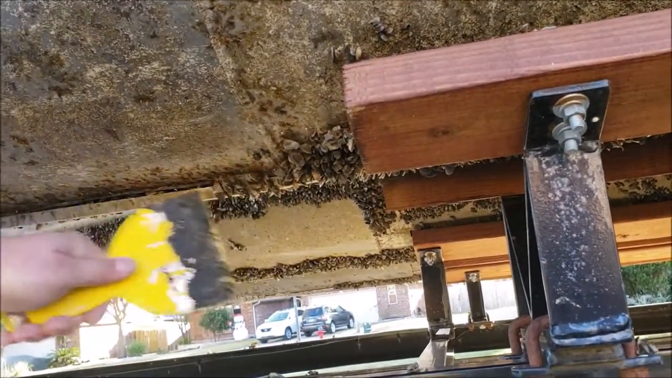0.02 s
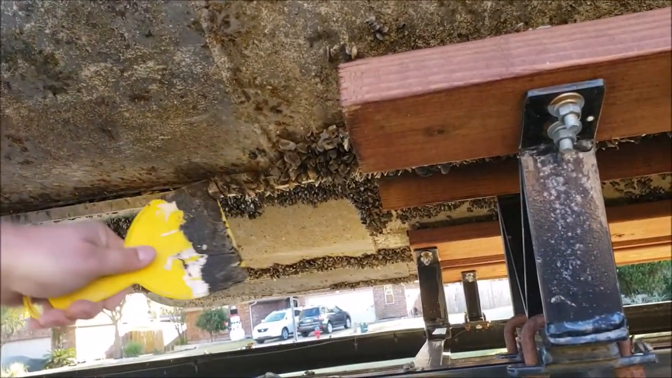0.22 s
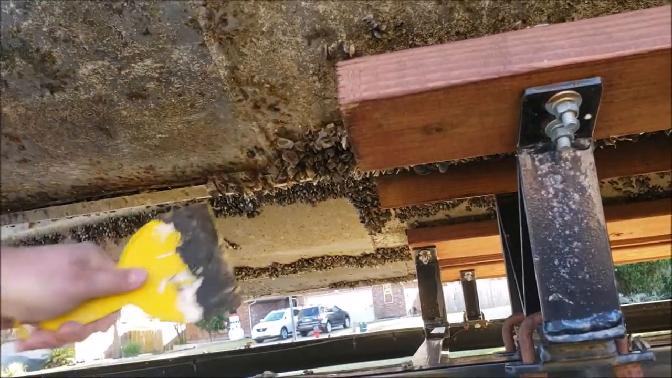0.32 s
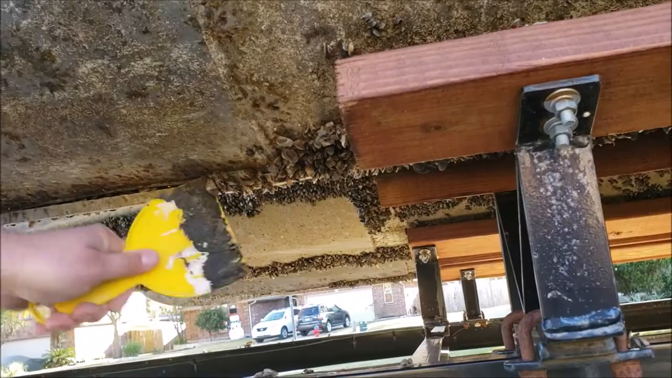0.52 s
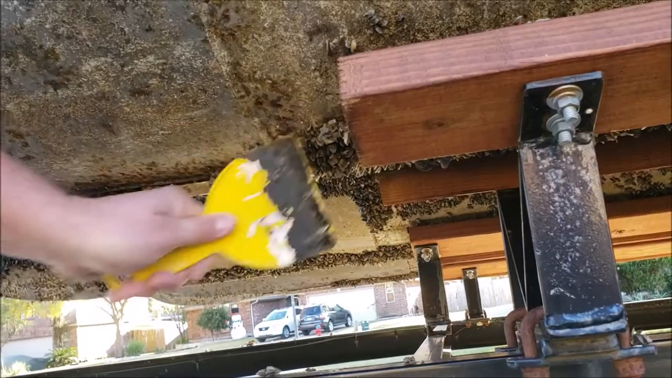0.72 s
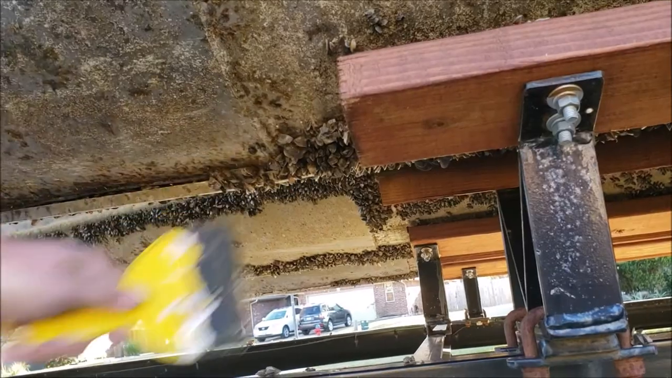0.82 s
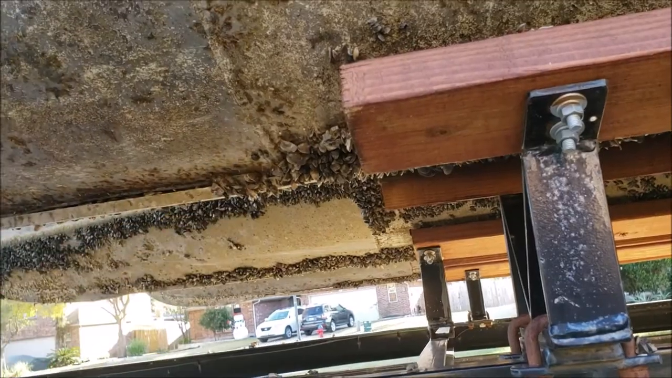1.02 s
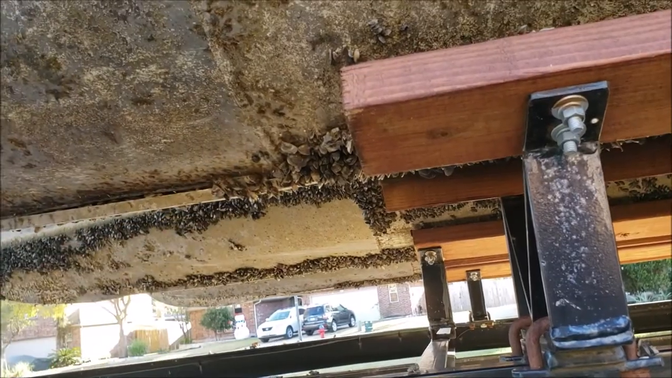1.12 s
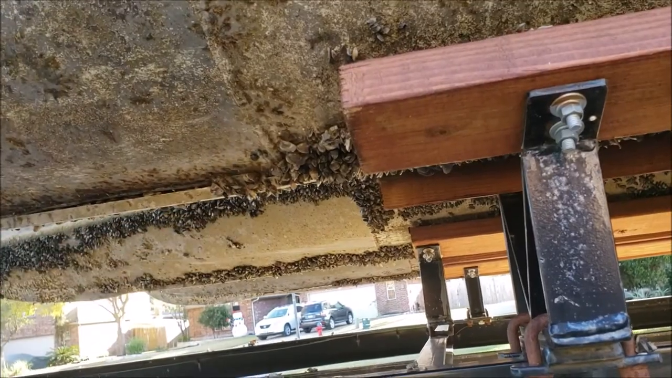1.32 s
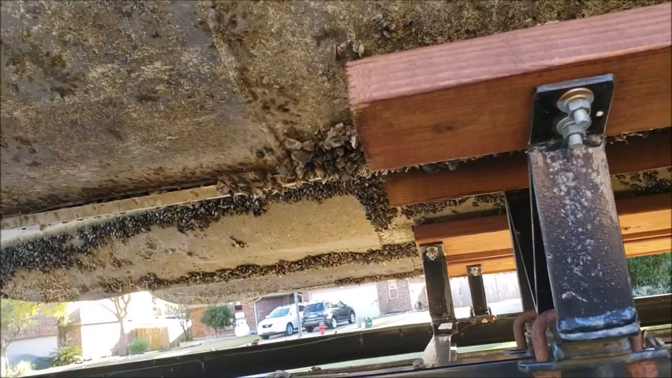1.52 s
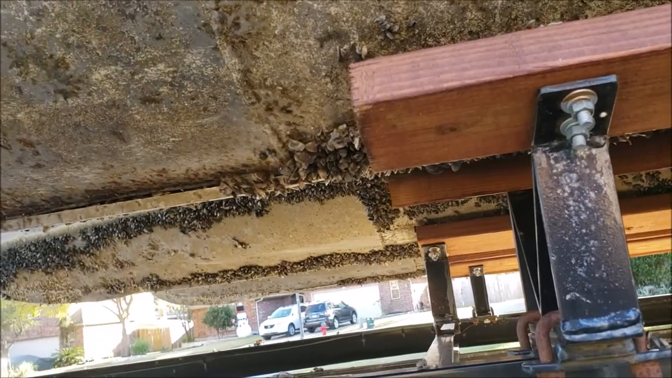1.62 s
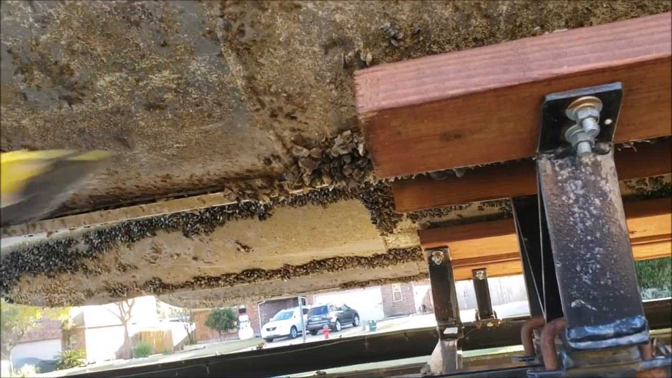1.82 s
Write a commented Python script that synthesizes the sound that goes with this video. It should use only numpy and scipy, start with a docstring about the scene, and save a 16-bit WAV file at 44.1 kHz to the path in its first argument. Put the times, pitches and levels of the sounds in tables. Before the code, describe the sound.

A hand scraper judders twice across crusted shells under a hollow metal boat tube, making it ring and boom. A shell cracks off and its pieces land. Outdoors, with a short echo and a distant rumble.

```python
"""Over a distant rumble and a fading ring, crumbs tick and a hand scraper judders across a shell crust.
The crust coats the underside of a hollow metal boat tube, outdoors. Twice the blade judders, knocking
the wall so that the tube rings and booms; then a shell cracks off and its pieces land.
Something swishes faintly near the end. The deck overhead throws the sound of the work back."""
import sys
import numpy as np
from scipy import signal
from scipy.fft import rfft, irfft, next_fast_len
from scipy.io import wavfile
from scipy.ndimage import uniform_filter1d

SR = 44100
rng = np.random.default_rng(int(sys.argv[2]) if len(sys.argv) > 2 else 0)


def unload_audio(sound):
    """Save the sound as a 16-bit wav file, at the path given as the first command line argument."""
    columns = np.transpose(np.atleast_2d(sound))
    # keep every value between -1 and 1, then stretch to whole-number steps
    steps = np.round(np.clip(columns, -1, 1) * 32767)
    wavfile.write(sys.argv[1], SR, steps.astype(np.int16))


N = 81585
T = np.arange(N) / SR
SIZE = next_fast_len(2 * N)
HZ = np.maximum(np.fft.rfftfreq(SIZE, 1 / SR), 1)
CRUST_PAN_DB = 0.54  # added on the left, taken off on the right

# The blade catches on the crust: start_s, knock_db, grit_db
CATCHES = [(.185, -18.5, -9), (0.2051, 1.5, 2), (.2123, -2.5, -10), (0.2165, -1.5, -8.5), (0.2238, 3, -5),
           (0.2326, -9, -3), (.2376, 2, -22), (.4875, 6, 8), (0.4997, 1.5, -10.5), (0.5023, 0, -12),
           (0.5056, 0, -14), (0.514, -5.5, -36)]
# The shell breaks: start_s, level_db, decay_s
CRACKS = [(0.592, -12.5, .004), (.5945, -2.5, 0.0036), (0.5969, 1, 0.0013), (0.598, -2, 0.0026),
          (.6013, -3, 0.002), (0.6155, -17.5, 0.0011), (0.618, -9.5, 0.0037)]


def from_db(db):
    """Turn decibels into a gain."""
    return 10 ** (np.asarray(db) / 20)


def at_hz(points, hz, column=1):
    """Read a table between its rows, on a log-frequency scale."""
    points = np.array(points)
    return np.interp(np.log(hz), np.log(points[:, 0]), points[:, column])


def filtered(x, response):
    """Apply a frequency response."""
    return irfft(rfft(x, SIZE) * response, SIZE)[..., :N]


def colour(x, tone):
    """Give x a tone, with no ringing ahead of a hit (a minimum-phase filter)."""
    cepstrum = irfft(np.log(from_db(at_hz(tone, HZ))), SIZE)
    cepstrum[1:SIZE // 2] *= 2
    cepstrum[SIZE // 2 + 1:] = 0
    return filtered(x, np.exp(rfft(cepstrum)))


def burst(start_s, rise_s, decay_s):
    """A level that rises quickly and dies away."""
    age = np.maximum(T - start_s, 0)
    return (1 - np.exp(-age / rise_s)) * np.exp(-np.minimum(age / decay_s, 60))


def diffuse(sources=None):
    """Mix two unrelated signals (white noise by default) so they seem to come from all sides."""
    # How alike the two ears are: pitch_hz, correlation
    likeness = [(60, 0.97), (220, 0.87), (450, .68), (800, 0.18), (1300, -.45), (2500, 0.058),
                (16000, 0.039)]
    a, b = rng.standard_normal((2, N)) if sources is None else sources
    alike = at_hz(likeness, HZ)
    mid = filtered(a, np.sqrt((1 + alike) / 2))
    side = filtered(b, np.sqrt((1 - alike) / 2))
    return np.array([mid + side, mid - side])


def from_left(x, lag_s=0.00019):
    """The sound reaches the left ear first."""
    return np.array([x, filtered(x, np.exp(-2j * np.pi * HZ * lag_s))])


def crunch(breaks, tone, rise_s=0.00015, grains_per_s=5500, spread_db=3.5):
    """Each break is a dying burst of tiny fractures."""
    force = sum(from_db(db) * burst(s, rise_s, decay_s) for s, db, decay_s in breaks)
    sizes = from_db(spread_db * np.minimum(rng.exponential(1, (2, N)), 3))
    grains = sizes * rng.choice([-1, 1], (2, N)) * (rng.random((2, N)) < grains_per_s / SR)
    grains /= np.sqrt(np.maximum(uniform_filter1d(grains ** 2, size=128), 1e-3))  # even out the level
    return colour(diffuse(grains * force), tone) * from_db([[CRUST_PAN_DB], [-CRUST_PAN_DB]])


def background(hiss_above_hz=670, echo_fade_s=1):
    """Distant rumble, a thin hiss that wavers, and the echo of a stroke just gone by."""
    # Tone of the open air: pitch_hz, level_db
    air_tone = [(20, -58), (45, -36), (85, -30.5), (125, -34.5), (200, -42), (320, -48.5), (520, -61),
                (900, -51.5), (1700, -58.5), (3500, -62.5), (7200, -59.5), (8800, -67.5), (13000, -62.5),
                (16000, -61.5)]
    # Its lean to the left: pitch_hz, lean_db
    air_lean = [(1500, 0), (5000, 1.5), (15000, 2.5)]
    # Wavering of the treble: time_s, level_db
    hiss_levels = [(0, -2), (.16, -4), (.45, 1), (.95, 1), (1.08, -2), (1.27, -1), (1.42, 0), (1.6, .5),
                   (1.67, -4), (1.78, 0), (1.85, 0)]
    # Tone of the echo: pitch_hz, level_db
    echo_tone = [(100, -83), (300, -44), (500, -46), (800, -46.5), (1400, -65), (4000, -81)]
    lean = from_db(at_hz(air_lean, HZ) * np.array([[1], [-1]]))
    air = filtered(colour(diffuse(), air_tone), lean)
    treble = filtered(air, HZ ** 2 / (HZ ** 2 + hiss_above_hz ** 2))
    waver = from_db(np.interp(T, *np.transpose(hiss_levels))) - 1
    echo = colour(diffuse(), echo_tone) * np.exp(-np.log(1000) * T / echo_fade_s)
    return air + treble * waver + echo


def tube_ring(scatter_db=3.5, rise_s=0.00084, crack_db=-6.5):
    """Every catch and crack feeds the tube's own notes, which then ring down."""
    # The tube's notes: pitch_hz, level_db, ring_s (time to fall 60 dB)
    notes = [(280.2, -49, 0.31), (350.8, -49.5, .25), (377, -50, 0.34), (424, -52, 0.36),
             (448.6, -60.5, 1.42), (472.6, -37, .14), (589, -33, 0.13), (614, -57, 1.1), (745, -35.5, 0.13),
             (794, -42, 0.2), (851, -50, 0.24), (936, -36.5, 0.1), (1014, -36.5, 0.069), (1265, -57, 0.2)]
    # A stroke just gone by, still ringing: start_s, level_db
    earlier_stroke = (-0.32, 12)
    blows = [earlier_stroke] + [(s, db) for s, db, _ in CATCHES]
    blows += [(s, db + crack_db) for s, db, _ in CRACKS]
    out = 0
    for hz, note_db, ring_s in notes:
        decay_s = ring_s / np.log(1000)
        swing = sum(from_db(rng.normal(db, scatter_db)) * burst(s, rise_s, decay_s) for s, db in blows)
        out += from_db(note_db) * swing * np.sin(2 * np.pi * (hz * T + rng.random()))
    return from_left(out)


def crumbs():
    """Small chips tick as they hit or snap."""
    # The ticks: start_s, level_db, decay_s
    ticks = [(.024, -17, .002), (.113, -22, 0.0028), (.313, -9, 0.0022), (.3272, -11, 0.0049),
             (.336, -16.5, 0.013), (.656, -30, .003), (.786, -9.5, 0.022), (.7947, 5, 0.0012),
             (.798, -2, .005), (1.338, -19, 0.0055), (1.7925, -8.5, .0015), (1.804, -3.5, 0.0022),
             (1.8122, -10, 0.0028)]
    # Their bright tone: pitch_hz, level_db
    tone = [(200, -58), (900, -45), (2000, -55), (3100, -31.5), (4200, -34), (6400, -34.5), (7300, -28),
            (8500, -39.5), (12000, -30), (15500, -27.5)]
    return crunch(ticks, tone)


def reflections(x, delay_s=.004):
    """A quick dense echo from deck and ground, then a faint long tail, each dying octave by octave."""
    # Echoes under the boat: pitch_hz, near_db, near_fade_s, far_db, far_fade_s (fades of 60 dB)
    space = [(99, 10.5, 0.4, 6, 0.37), (302, -3.5, 0.54, -2.5, 1), (610, 1, 0.13, -1.5, 0.93),
             (1130, -3, 0.067, -10.5, 0.48), (2700, -0.5, 0.18, -3.5, .75), (6960, -10.5, 0.03, -27, 1),
             (15000, -15, 0.14, -20.5, 1)]
    noise, echo = rfft(diffuse(), SIZE), 0
    for hz in 62.5 * 2.0 ** np.arange(9):
        octave = np.maximum(1 - np.abs(np.log2(HZ / hz)), 0)
        band = irfft(noise * octave, SIZE)[:, :N]
        near_db, near_fade_s, far_db, far_fade_s = (at_hz(space, hz, k) for k in range(1, 5))
        power = 0
        for db, fade_s in (near_db, near_fade_s), (far_db, far_fade_s):
            rate = np.log(1e6) / fade_s
            power += from_db(db) ** 2 * rate * np.exp(-rate * T)
        echo += band * np.sqrt(power / SR)
    return filtered(x, rfft(echo, SIZE) * np.exp(-2j * np.pi * HZ * delay_s))


def knocks():
    """Each catch of the blade gives the wall one dull knock."""
    # Tone of a knock: pitch_hz, level_db
    tone = [(25, -53), (70, -28), (170, -12), (300, 0), (500, 8), (750, 9.5), (1080, 13.5), (1400, -3),
            (2000, -13.5), (4000, -27), (16000, -56)]
    blows = np.zeros(N)
    for s, db, _ in CATCHES:
        blows[int(s * SR)] -= from_db(db)
    return from_left(colour(blows, tone))


def grit(decay_s=.008):
    """The blade grinds a little grit at each catch."""
    # Tone of the grinding: pitch_hz, level_db
    tone = [(30, -49.5), (200, -26.5), (700, -18.5), (1500, -23), (2500, -35), (3700, -33.5), (5000, -41.5),
            (6000, -33), (7500, -42.5), (9000, -45.5), (12000, -43.5), (15500, -35.5)]
    return crunch([(s, db, decay_s) for s, _, db in CATCHES], tone, rise_s=0.00037)


def snaps():
    """Single sharp clicks: the shell snapping, pieces landing and a few faint ticks."""
    # The clicks: start_s, level_db, right_ear_lag_s
    clicks = [(.5969, -3, 0.00013), (.7144, -23, .00002), (.7954, -15, .00002), (0.22, -32, .00005),
              (1.3383, -37, .00005), (1.8045, -44, .00005), (1.812, -43, .00005)]
    out = np.zeros((2, N))
    for s, db, lag_s in clicks:
        out[0, int(s * SR)] += from_db(db + CRUST_PAN_DB)
        out[1, int((s + lag_s) * SR)] += from_db(db - CRUST_PAN_DB)
    return out


def boom(rise_s=0.0026):
    """The broad wall shudders when the blade lets go."""
    # The shudders: start_s, level_db, decay_s
    shudders = [(.226, 2.5, 0.091), (.596, 3.5, 0.066)]
    # Their deep tone: pitch_hz, level_db
    tone = [(20, -47), (45, -22.5), (90, -16.5), (140, -25), (220, -36), (500, -53), (3000, -100)]
    level = sum(from_db(db) * burst(s, rise_s, decay_s) for s, db, decay_s in shudders)
    return colour(diffuse(), tone) * level


def shell_crack():
    """A shell breaks off in a quick run of cracks."""
    # Tone of the shell: pitch_hz, level_db
    tone = [(25, -34), (90, -25.5), (250, -18), (450, -9.5), (950, -8), (1150, -21), (1350, -11.5),
            (1600, -17.5), (2200, -19.5), (6200, -20), (7300, -13.5), (8800, -20), (11000, -23),
            (15500, -19)]
    return crunch(CRACKS, tone)


def falling_piece():
    """A large piece of shell lands and bounces."""
    # The landings: start_s, level_db, decay_s
    landings = [(.7105, 5.5, 0.0026), (.7142, 3.5, 0.0032), (.718, -6, 0.011), (.7935, -3, .004)]
    # Tone of the piece: pitch_hz, level_db
    tone = [(25, -61), (80, -42), (220, -32), (600, -27), (820, -13.5), (1150, -18.5), (1500, -24.5),
            (2100, -26), (4200, -26.5), (5200, -31.5), (7200, -33.5), (9000, -45), (15500, -33)]
    return crunch(landings, tone)


def swish(peak_s=1.585, rise_s=.1, fall_s=.018):
    """Soft, high rubbing noise that grows slowly and ends quickly."""
    # Tone of the rubbing: pitch_hz, level_db
    tone = [(500, -74), (3000, -64), (6500, -55), (9000, -56), (13000, -46.5), (16000, -49)]
    swell = np.exp(np.minimum((T - peak_s) / rise_s, (peak_s - T) / fall_s))
    return swell * colour(diffuse(), tone)


def scene():
    """The work under the boat, its echoes, the ringing tube and the open air."""
    work = knocks() + grit() + shell_crack() + snaps() + falling_piece() + crumbs()
    return work + reflections(work) + tube_ring() + boom() + swish() + background()


def record(dry, cutoff_hz=15900):
    """Cut off the very highest treble steeply."""
    return signal.sosfilt(signal.ellip(12, .1, 80, cutoff_hz, fs=SR, output="sos"), dry)


dry = scene()
out = record(dry)
unload_audio(out)
```